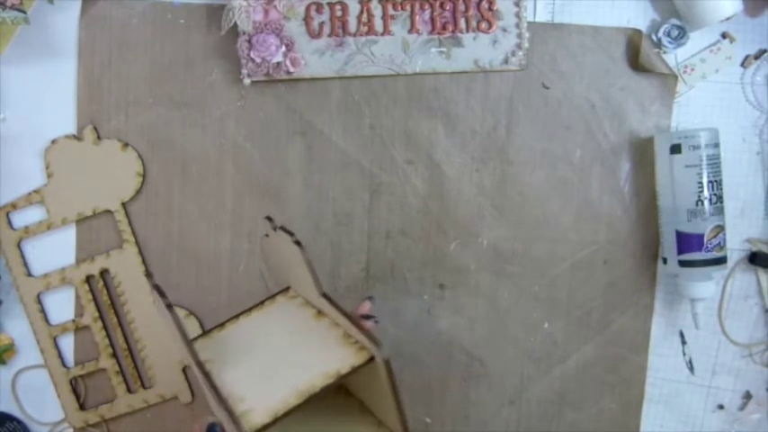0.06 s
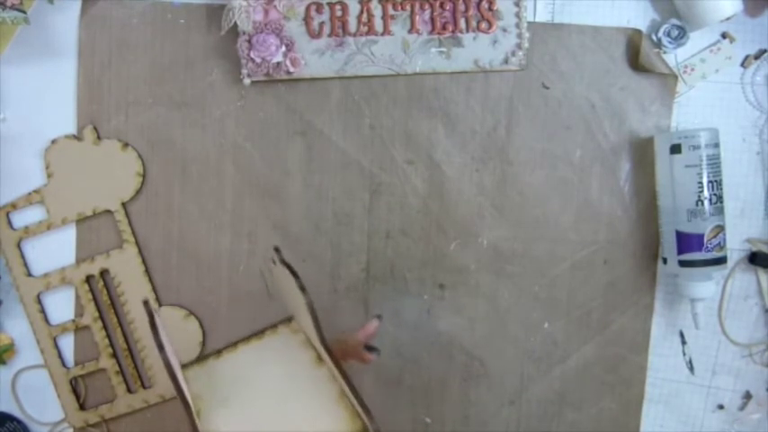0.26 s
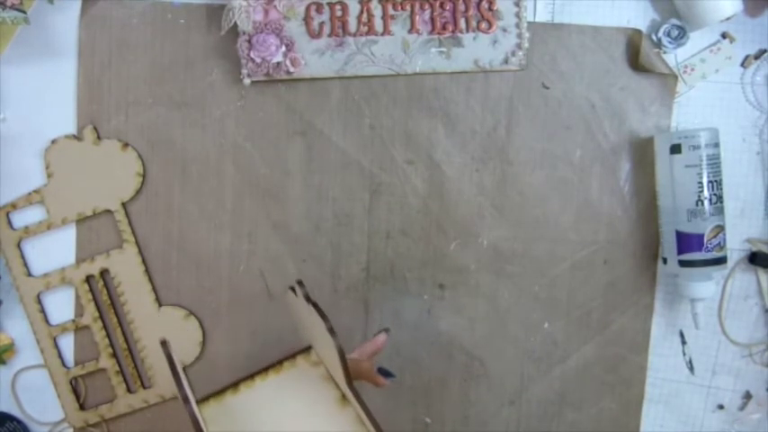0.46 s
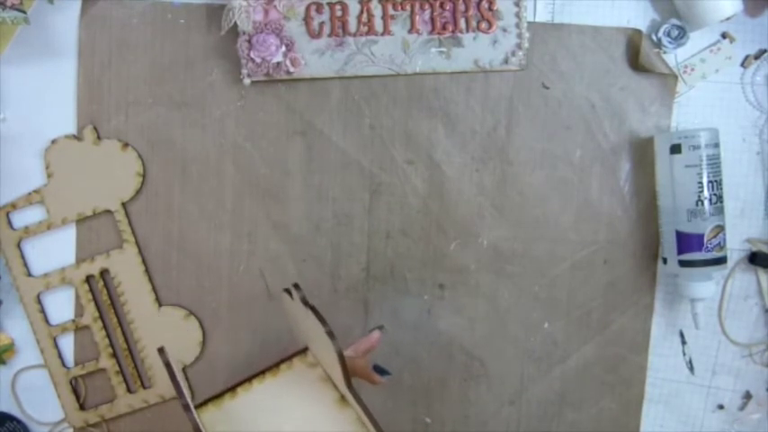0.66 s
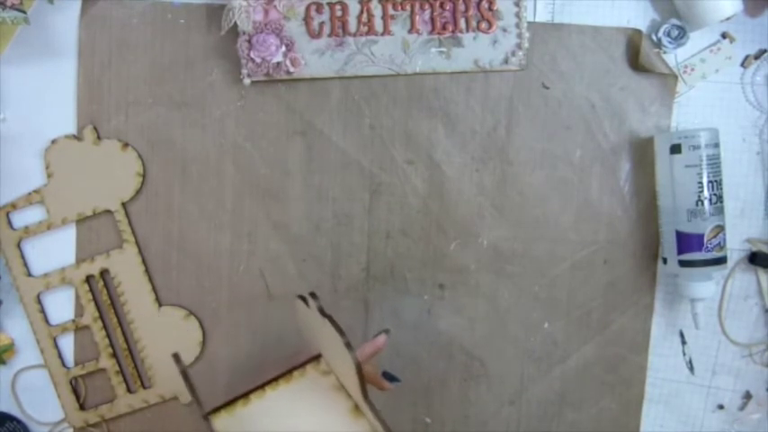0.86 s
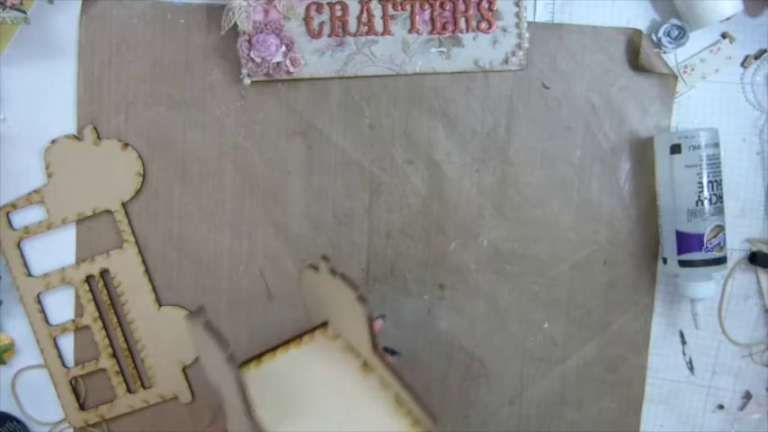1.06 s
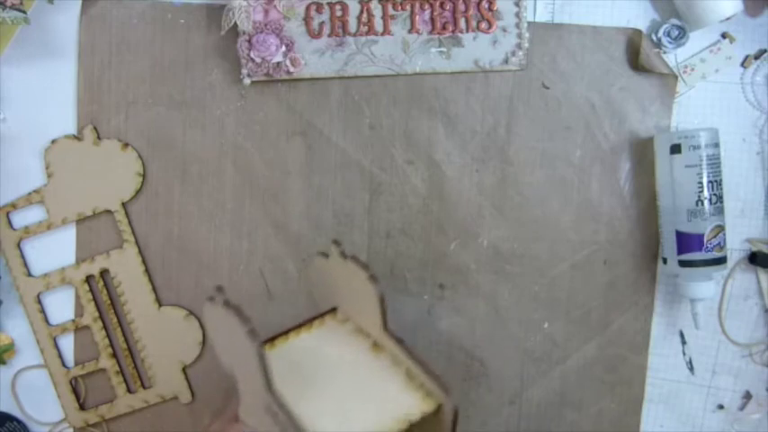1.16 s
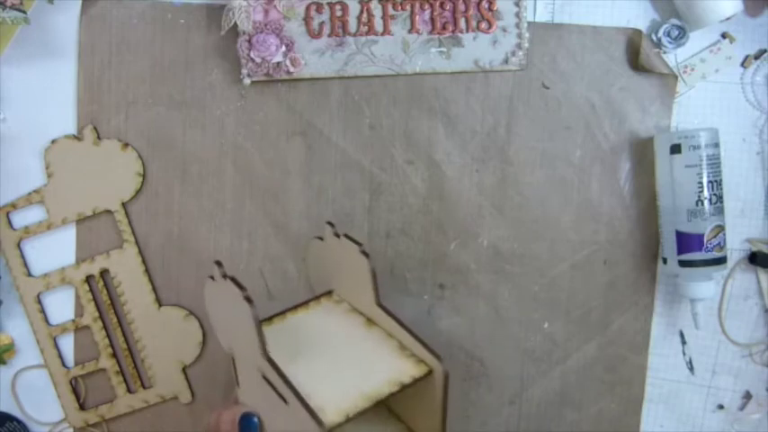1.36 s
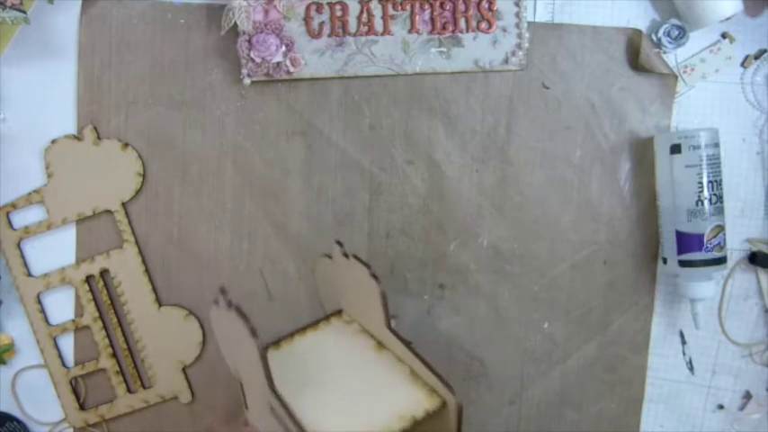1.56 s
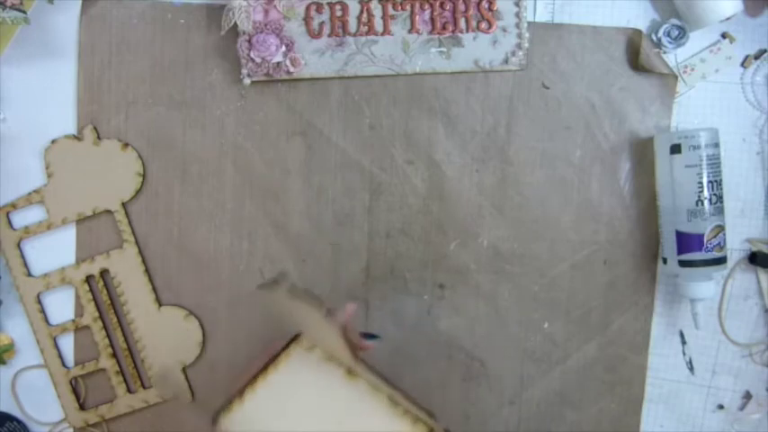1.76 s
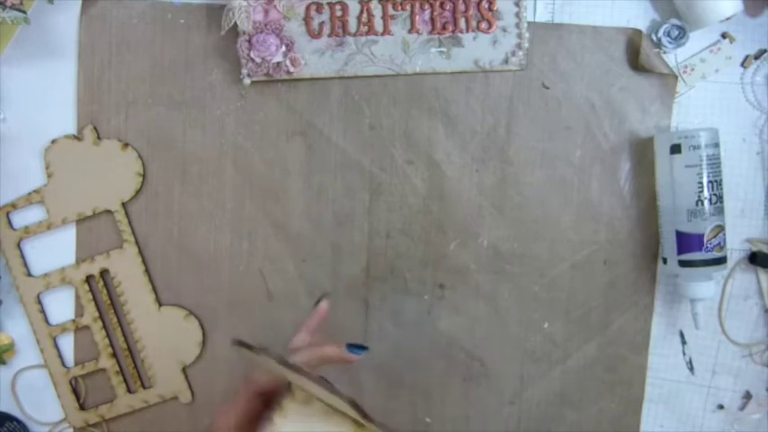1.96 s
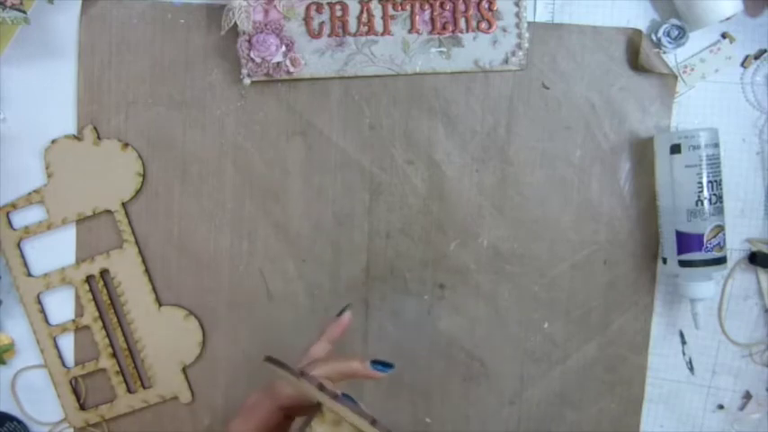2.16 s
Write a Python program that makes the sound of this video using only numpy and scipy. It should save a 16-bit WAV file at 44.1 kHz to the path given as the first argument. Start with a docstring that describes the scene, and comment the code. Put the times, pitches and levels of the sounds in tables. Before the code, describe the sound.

Thin wooden box scraped in four quick raspy strokes, with two sharp loud clicks between

```python
"""On a craft table in a small room with a low hum, a box of thin wooden board is scraped in four quick strokes.
Random friction slips excite a rasp, the hollow body and a gliding panel ring; brief groans join them.
Faint brushing and light touches lie between; two sharp clicks, made of a noise burst and dying modes,
overload the recorder. The box chatters into the last stroke, and hollow modal knocks sound as it ends."""
import sys
import numpy as np
from scipy import signal
from scipy.fft import rfft, irfft, next_fast_len
from scipy.io import wavfile

SR = 44100
rng = np.random.default_rng(int(sys.argv[2]) if len(sys.argv) > 2 else 0)


def to_wav(s):
    """Save 16-bit WAV."""
    ch = np.atleast_2d(s).T  # columns
    pcm = np.round(np.clip(ch, -1, 1) * 32767)  # PCM
    wavfile.write(sys.argv[1], SR, pcm.astype(np.int16))


N = 98122
TIME = np.arange(N) / SR
HZ = np.fft.rfftfreq(8192, 1 / SR)


def amp(db):
    """Level law: decibels to amplitude gain."""
    return 10 ** (np.asarray(db) / 20)


def evened(x):
    """Power normalisation to unit rms."""
    return x / np.sqrt(np.mean(x ** 2) + 1e-20)


def read(points):
    """Logarithmic frequency scale: interpolates a spectrum table onto the grid HZ."""
    hz, value = np.transpose(points)
    return np.interp(np.log(HZ + 1), np.log(hz + 1), value)


def level(s, db):
    """Amplitude envelope, linear in decibels, that fades quickly outside its points."""
    outside_s = np.maximum(s[0] - TIME, 0) + np.maximum(TIME - s[-1], 0)
    return amp(np.interp(TIME, s, db) - 900 * outside_s)  # fade in dB per second


def add(mix, s, sound):
    """Superposition: adds a sound to the mix from a given time."""
    part = mix[:, max(round(s * SR), 0):][:, :sound.shape[-1]]
    part += sound[..., :part.shape[1]]


def colour(x, db):
    """Minimum-phase filtering: a causal response of unit power with a given gain shape in dB."""
    log_gain = np.log(amp(np.maximum(db - db.max(), -100)))
    mirrored = np.r_[log_gain, log_gain[-2:0:-1]]
    # The Hilbert transform of the log gain supplies the phase
    spectrum = np.exp(np.conj(signal.hilbert(mirrored)))
    taps = np.fft.ifft(spectrum).real[:4096]
    taps = taps / np.linalg.norm(taps)
    return signal.fftconvolve(x, taps[None], axes=1)[:, :x.shape[1]]


def drift(rate_hz):
    """Low-pass random process of unit rms, with most of its motion below a rate."""
    size = next_fast_len(N, True)
    spectrum = rfft(rng.standard_normal(size))
    lowpass = 1 / (1 + (np.fft.rfftfreq(size, 1 / SR) / rate_hz) ** 4)
    return evened(irfft(spectrum * lowpass, size)[:N])


def pair(mid, side, side_db):
    """Sum and difference stereo: left and right from a shared and an opposed part."""
    opposed = amp(side_db) * side
    return np.array([mid + opposed, mid - opposed])


def pan(db):
    """Interchannel level difference: left and right gains, left louder for positive dB."""
    return amp(np.array([[db], [-db]]) / 2)


def resonate(x, hz, width_hz):
    """Complex one-pole resonance: shifts a moving pitch to zero, smooths, and shifts it back."""
    turn = np.exp(2j * np.pi * np.cumsum(hz) / SR)
    radius = np.exp(-np.pi * width_hz / SR)
    smoothed = signal.lfilter([1 - radius], [1, -radius], x / turn)
    return 2 * (turn * smoothed).real


def rubbed(x, hz, width_hz):
    """Cascaded resonance: two in series give steeper skirts, at unit rms."""
    once = resonate(x, hz, width_hz)
    return evened(resonate(once, hz, width_hz))


def ring(modes, t, rise_s):
    """Modal decay: a sum of exponentially dying modes with a soft build-up."""
    total = sum(amp(db - 60 * t / t60_s) * np.sin(2 * np.pi * hz * t) for hz, db, t60_s in modes)
    return total * (1 - np.exp(-(t / rise_s) ** 2))


def background():
    """Stationary noise and wavering hum: coloured noise with slowly modulated low sines."""
    # Room noise spectrum: hz, level_db (relative)
    floor_colour = [(20, -10.5), (40, -24.5), (80, -18), (115, -9), (260, -18.5), (850, -19.5),
                    (3500, -30.5), (5800, -27.5), (11000, -34.5), (15500, -44.5)]
    # Hum components: hz (centre), level_db (before the stereo width)
    hum_tones = [(117.5, -58.5), (141, -60), (193, -72)]
    floor_db, floor_side_db = -50.5, 5.5
    hum_wander_hz, hum_waver_db = 1.63, 2
    noise = pair(*rng.standard_normal((2, N + 4096)), floor_side_db)
    air = colour(noise, read(floor_colour))[:, -N:]  # drops the filter's build-up
    hum = np.zeros(N)
    for hz, db in hum_tones:
        pitch_hz = hz + hum_wander_hz * drift(rate_hz=6.4)
        tone = np.sin(2 * np.pi * np.cumsum(pitch_hz) / SR)
        waver = amp(hum_waver_db * drift(rate_hz=5.0))
        hum += amp(db) * evened(tone * waver)
    return amp(floor_db) * air + hum


def friction():
    """Stick-slip friction: sparse slips of uneven size over smooth noise, swayed by judder."""
    grains_per_s, grain_spread_db, smooth_share = 1500, 2.8, 0.35
    judder_hz, judder_db, side_db = 138, 0.5, -5.5
    happens = rng.random((2, N)) < grains_per_s / SR
    sign = rng.choice([-1, 1], (2, N))
    size = amp(grain_spread_db * np.minimum(rng.exponential(1, (2, N)), 4))
    grains = evened(happens * sign * size) + smooth_share * rng.standard_normal((2, N))
    grains = grains * amp(judder_db * drift(judder_hz))
    return evened(pair(*grains, side_db))


def edge_echoes(x):
    """Comb filtering: slips return from the panel edges after delays that shift with the contact."""
    delays_s, echo_share = (0.0011, 0.0023), 0.42
    wander, wander_hz = 0.07, 11  # fraction of the delay, and its rate
    out = x
    for delay_s in delays_s:
        back = np.round(delay_s * SR * (1 + wander * drift(wander_hz))).astype(int)
        out = out + echo_share * x[:, (np.arange(N) - back) % N]
    return evened(out)


def scrape(curve, rasp_colour, bands, ring_pitch, trim):
    """Source and resonator: friction drives a banded rasp, the hollow body and a gliding panel ring."""
    # Resonances of the box under friction: hz, width_hz, lift_db
    box_modes = [(744, 64, 7), (784.5, 47.3, 9), (887, 42, 12), (1927, 60, 6), (2084, 61, 7.5)]
    # Spectrum of the hollow body before those lifts: hz, level_db (relative)
    body_colour = [(200, -47.5), (450, -21.5), (600, -10.5), (700, 7), (900, -2.5), (1050, 8), (1500, -36)]
    rasp_low_hz, rasp_top_hz = 955, 11000
    ring_width_hz, ring_wander, ring_wander_hz = 313, 0.014, 25  # wander as a fraction of the pitch
    overtone_ratio, overtone_db = 2.2, -10.5
    s, rasp_db, body_db, ring_db = np.transpose(curve)
    rasp_trim, body_trim, ring_trim, pan_db = trim

    box = sum(db / (1 + (2 * (HZ - hz) / width_hz) ** 2) for hz, width_hz, db in box_modes + bands)
    band_loss = 10 * np.log10(1 + (rasp_low_hz / (HZ + 1)) ** 10 + (HZ / rasp_top_hz) ** 10)
    shape = read(rasp_colour) + box - band_loss
    # The rasp level refers to its part above 3 kHz
    treble_share = np.linalg.norm(amp(shape)[HZ > 3000]) / np.linalg.norm(amp(shape))
    rasp = colour(edge_echoes(friction()) * level(s, rasp_db + rasp_trim), shape) / treble_share

    body = colour(friction() * level(s, body_db + body_trim), read(body_colour) + box)

    pitch_hz = np.interp(TIME, *np.transpose(ring_pitch)) * (1 + ring_wander * drift(ring_wander_hz))
    drive = friction()
    overtone = rubbed(drive, pitch_hz * overtone_ratio, ring_width_hz)
    panel = rubbed(drive, pitch_hz, ring_width_hz) + amp(overtone_db) * overtone
    panel = panel * level(s, ring_db + ring_trim)
    return (rasp + panel) * pan(pan_db) + body * pan(db=3.0)


def groans():
    """Frictional excitation of one resonance: narrow bands of slips glide as brief groans and squeaks."""
    # Gliding tones: start_s, length_s, first_pitch_hz, last_pitch_hz, level_db (before panning)
    glides = [(0.013, 0.12, 7010, 6420, -32), (0.031, 0.041, 714, 688, -29), (0.178, 0.008, 2465, 2463, -7),
              (0.619, 0.03, 1337, 1393, -32.5), (1.014, 0.062, 1660, 1610, -51),
              (1.325, 0.053, 2610, 2505, -16.5), (1.393, 0.018, 747, 616, -33.5),
              (1.848, 0.032, 1680, 1470, -24.5), (1.875, 0.02, 1234, 1277, -23),
              (1.92, 0.04, 523, 430, -44)]
    width_hz = 95
    out = np.zeros((2, N))
    drive = friction()
    for s, length_s, first_hz, last_hz, db in glides:
        u = np.arange(0, length_s, 1 / SR) / length_s
        slips = np.roll(drive, -round(s * SR), axis=1)[:, :len(u)]
        pitch_hz = first_hz + (last_hz - first_hz) * u
        tone = rubbed(slips, pitch_hz, width_hz) * np.sqrt(np.sin(np.pi * u))
        add(out, s, amp(db) * evened(tone))
    return out * pan(db=4.0)


def brush():
    """Broadband friction noise: light contact with the table gives a faint high swish."""
    # Envelope of the brushing: time_s, level_db
    envelope = [(.3, -50), (.55, -82), (.66, -50), (.73, -41.5), (.79, -44), (.9, -76), (.98, -52),
                (1.06, -42), (1.1, -43.5), (1.2, -55), (1.62, -59), (1.67, -43.5), (1.72, -52)]
    # Spectrum of the brushing: hz, level_db (relative)
    swish_colour = [(400, -45), (1000, -11.5), (1600, 1.5), (3000, -8), (5000, 3.5), (8500, 4.5),
                    (12000, -11.5), (15500, -20.5)]
    return colour(friction() * level(*np.transpose(envelope)), read(swish_colour))


def crack(t, peak_s):
    """Impulsive noise: a burst swells and dies within milliseconds, then the panels rattle unevenly."""
    # Spectrum of the burst and rattle: hz, level_db (relative)
    crack_colour = [(100, -37), (250, -10.5), (500, -12.5), (800, -4), (1300, -11.5), (2400, 3), (3200, -5),
                    (5200, 2.5), (7000, 3.5), (9000, -9.5), (10500, -13), (15000, -46)]
    crack_db, tail_db, tail_s = -2.5, -22, 0.036  # tail: level against the burst, time constant
    rattle_hz, rattle_db = 150, 0.5
    u = t / peak_s
    burst = u * np.exp(1 - u)
    rattle = amp(tail_db + rattle_db * drift(rattle_hz)[:len(t)])
    rattle = rattle * np.exp(-t / tail_s) * (1 - np.exp(-u))
    noise = pair(*rng.standard_normal((2, len(t))), side_db=-5.5)
    return amp(crack_db) * colour(noise * (burst + rattle), read(crack_colour))


def blows():
    """Impact excitation: light touches are noise bursts; clicks and hollow knocks add dying modes."""
    # Light touches: start_s, level_db (relative)
    touches = [(0.5755, -22), (0.8215, -17.5), (1.578, -39)]
    # Sharp clicks: start_s, level_db (relative), left_right_db
    clicks = [(0.7951, -2.5, 2), (1.0891, -2.3, 0.5)]
    # Modes of a click: hz, level_db (relative), t60_s
    click_modes = [(756.5, -11, 0.077), (817, -13, 0.077), (1880, -11, 0.028), (2396, -7.5, 0.029),
                   (2532, -9, 0.029), (3744, -20.5, 0.1), (5000, -14, 0.14), (5260, 0.5, 0.026),
                   (5900, -38, 0.1), (6940, -18, 0.072)]
    # Knocks of the box on the table: start_s, level_db (relative), tick_db and deep_ring_db (relative to it)
    knocks = [(0.857, -22, -12, -40), (1.7115, -6, -27, -50), (1.732, -11.5, -33, -48),
              (1.886, 2, -37, -44), (1.8985, -4, -30, -42), (1.923, 4, -19, -21.5)]
    # Hollow modes of a knock: hz, level_db (relative), t60_s
    knock_modes = [(774, -8.5, 0.032), (827.5, 5.5, 0.023), (932, -10, 0.024), (2970, -13, 0.021)]
    # Longer modes of its deep ring: hz, level_db (relative), t60_s
    deep_modes = [(426, -17, 0.13), (471, -3.5, 0.11), (758, -4, 0.12), (918, 0, 0.12)]
    touch_peak_s, click_peak_s, knock_peak_s = 0.0013, 0.0019, 0.0031
    click_rise_s, knock_rise_s = 0.0016, 0.0042
    out = np.zeros((2, N))
    t = np.arange(SR // 3) / SR
    for s, db in touches:
        add(out, s, amp(db) * crack(t, touch_peak_s))
    for s, db, pan_db in clicks:
        click = crack(t, click_peak_s) + ring(click_modes, t, click_rise_s)
        add(out, s, amp(db) * pan(pan_db) * click)
    for s, db, tick_db, deep_db in knocks:
        hollow = ring(knock_modes, t, knock_rise_s) + amp(deep_db) * ring(deep_modes, t, knock_rise_s)
        tick = amp(tick_db) * crack(t, knock_peak_s)
        add(out, s, amp(db) * (pan(db=4.5) * hollow + tick))
    return out


def room(x):
    """Reverberation: early reflections from the table and a short tail, different at each side."""
    # Decay of the tail: hz, t60_s
    decay = [(200, 0.27), (2500, 0.26), (5000, 0.33), (9000, 0.25)]
    tail_db, early_db, early_s = -11.5, -10, 0.018  # levels against the direct sound; time constant
    t = np.arange(SR // 2) / SR
    shape = (2, len(t))
    echoes = rng.choice([-1., 1.], shape) * (rng.random(shape) < 4000 / SR) * (t > 0.006)
    hz, at_s, z = signal.stft(echoes, SR, nperseg=256)
    t60_s = np.interp(hz, HZ, read(decay))[:, None]
    tail = signal.istft(z * amp(-60 * at_s / t60_s), SR, nperseg=256)[1][:, :len(t)]
    early = rng.standard_normal(shape) * (rng.random(shape) < 1200 / SR) * (t > 0.002)
    early = early * np.exp(-t / early_s)
    response = np.zeros(shape)
    for db, part in [(tail_db, tail), (early_db, early)]:
        response = response + amp(db) * part / np.linalg.norm(part, axis=1, keepdims=True)
    return x + signal.fftconvolve(x, response, axes=1)[:, :N]


def widen(x):
    """Frequency-dependent stereo width: the microphone pair hears some bands wider than others."""
    # Gain of the left-right difference: hz, gain_db
    width = [(60, -12), (130, -12.5), (350, 3.5), (750, -3), (1300, -2), (2500, -5), (5500, -8.5),
             (8500, -1), (13000, -5.5)]
    gain = amp(np.interp(np.fft.rfftfreq(N, 1 / SR), HZ, read(width)))
    side = irfft(rfft((x[0] - x[1]) / 2) * gain, N)
    return x.mean(0) + np.array([side, -side])


def scene():
    """Superposition of sources: strokes, groans, blows and brushing in the room, over its background."""
    # Four strokes, the last with a short catch before it as a table of its own; levels before trims:
    # time_s, rasp_db (its part above 3 kHz), body_db, panel_ring_db
    curves = [
        [(0.0, -37.5, -30, -55), (0.036, -25, -30, -50), (0.08, -16, -26, -43), (0.096, -17.5, -17.5, -28),
         (0.158, -16.5, -37, -13.5), (0.18, -16.5, -28, -10), (0.22, -15, -25, -11.5), (0.244, -26, -29.5, -43),
         (0.3, -64, -68, -59)],
        [(.5755,-66,-52,-62), (.5775,-28.5,-33,-45), (.585,-22,-39.5,-25), (.6,-28,-37.5,-30),
         (.628,-31,-36,-48), (.648,-32.5,-30.5,-46), (.68,-66,-58,-60)],
        [(1.17, -56, -73, -61), (1.19, -40, -37, -61), (1.272, -13.5, -23, -36.5), (1.324, -15.5, -29, -28),
         (1.354, -10, -35, -11.5), (1.37, -13, -28, -16), (1.402, -21, -36, -26), (1.42, -33.5, -65, -48),
         (1.46, -64, -72, -61)],
        [(1.652,-51,-50.5,-67), (1.697,-49.5,-45.5,-49), (1.703,-25,-32.5,-30), (1.724,-31.5,-27,-48),
         (1.741,-24,-33,-58), (1.76,-54,-33,-42)],
        [(1.762,-29.5,-29,-44), (1.778,-23.5,-21,-27), (1.805,-18.5,-18,-19), (1.84,-11.5,-18.5,-24),
         (1.855,-10.5,-40,-12), (1.873,-12.5,-25,-10.5), (1.888,-22.5,-33,-19), (1.904,-33,-57,-50),
         (1.918,-29,-19.5,-51)],
    ]
    # Spectrum of the rasp before lifts and band limits, one table per curve: hz, level_db (relative)
    rasp_colours = [
        [(530, -20), (900, -33), (1000, -12.5), (1510, -14), (2480, -9.5), (3210, -11.5), (7320, -13),
         (11000, -24.5), (15000, -79.5)],
        [(530, -29), (1390, -1.5), (2420, -9), (3500, -11), (6660, -4.5), (10800, -16), (15000, -41)],
        [(530, -51), (1340, -3), (1700, -12.5), (2400, -6), (3170, -9.5), (7580, -9.5), (10500, -21),
         (15000, -58)],
        [(530, -20.5), (900, 0), (2570, -14.5), (6740, -12.5), (11300, -21.5), (15000, -57)],
        [(530, -60.5), (1000, -11), (1250, 1.5), (2700, -8), (3400, -5.5), (6350, -3.5), (11000, -17.5),
         (15000, -44)],
    ]
    # Higher resonances, which change with the place of contact, one table per curve: hz, width_hz, lift_db
    contact_bands = [
        [(1135, 69, 10.5), (3480, 71, 1.5), (4076, 110, 8), (5024, 150, 11.5), (5610, 89, 9), (6410, 110, 6.5),
         (7240, 130, 5)],
        [(1400, 180, 3.5), (3420, 75, 13), (4190, 120, 15.5), (4800, 220, 12), (5610, 120, 7.5), (6600, 69, 10),
         (7200, 110, 7)],
        [(1434, 74, 0.5), (2560, 40, 11), (4830, 360, 4.5), (5570, 110, 13.5), (6700, 140, 4.5), (7360, 84, 11)],
        [(2470, 210, 6), (3400, 67, 12), (4530, 490, 14.5), (5270, 200, 7), (6560, 150, 13), (6900, 160, 13.5)],
        [(1265, 62, 4.5), (2400, 90, -11), (4940, 110, 9.5), (5500, 74, 7.5), (6170, 70, -9), (6500, 130, 6.5),
         (7920, 110, 9.5)],
    ]
    # Panel ring as the contact travels, one table per curve: time_s, pitch_hz (before its random wander)
    ring_pitches = [
        [(.09, 2780), (.125, 2540), (.18, 2402), (.22, 2605)],
        [(.58, 2320), (.62, 2460)],
        [(1.3, 2610), (1.36, 2547), (1.41, 2440)],
        [(1.7, 2430), (1.75, 2500)],
        [(1.82, 2435), (1.852, 2615), (1.88, 2423)],
    ]
    # Trims, one row per curve: rasp_db, body_db, ring_db, left_right_db (of rasp and ring)
    trims = [(0, -3.5, -2, 0.2), (-0.5, -7, -6, 0.2), (-1, -1, -2.5, 0.1), (-0.5, 3, 2.5, 0.5),
             (0, -3, -1.5, 0)]
    strokes = sum(scrape(*stroke) for stroke in zip(curves, rasp_colours, contact_bands, ring_pitches, trims))
    return widen(room(strokes + groans() + blows() + brush()) + background())


def record(dry):
    """Saturation and band limiting: peaks clip around a slight offset, then a low-pass filter acts."""
    offset, ceiling, knee = -0.012, 0.96, 19  # a higher knee exponent gives a harder clip
    edge_hz = 15800
    x = dry + offset
    clipped = x / (1 + abs(x / ceiling) ** knee) ** (1 / knee)
    lowpass = signal.firwin(511, edge_hz, window=("kaiser", 9), fs=SR)
    return signal.oaconvolve(clipped, lowpass[None], "same")


dry = scene()
out = record(dry)
to_wav(out)
```